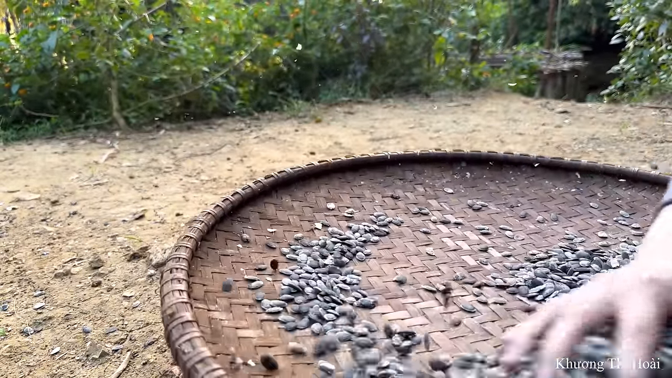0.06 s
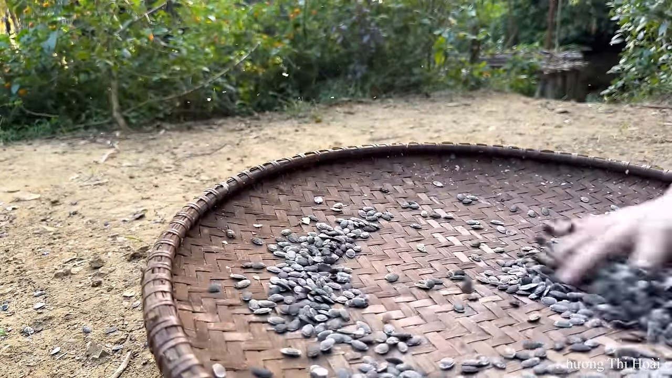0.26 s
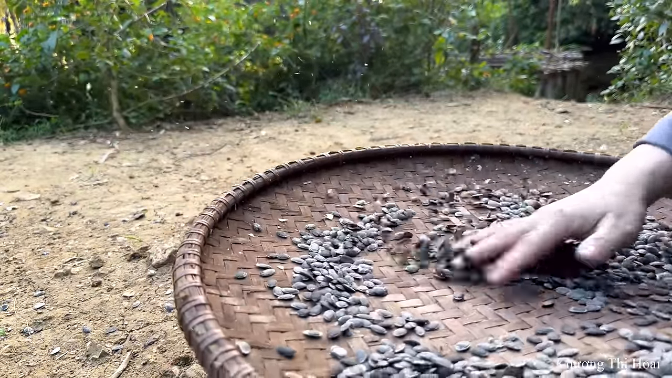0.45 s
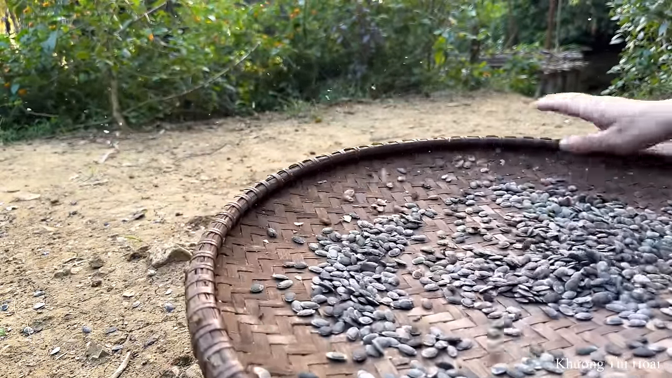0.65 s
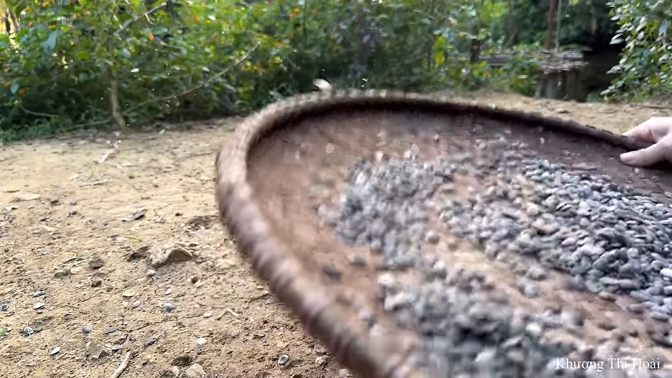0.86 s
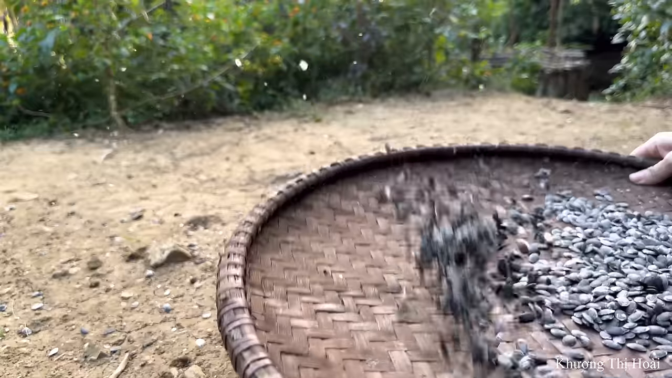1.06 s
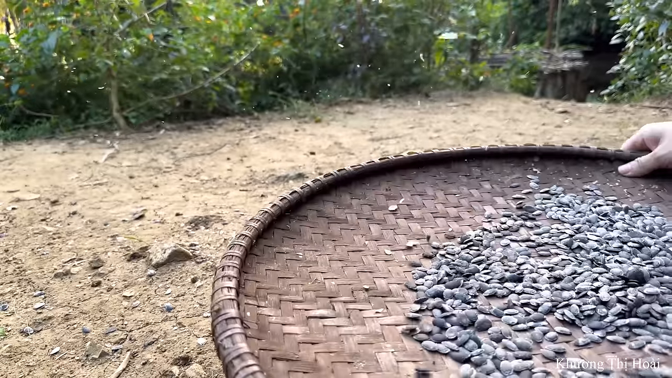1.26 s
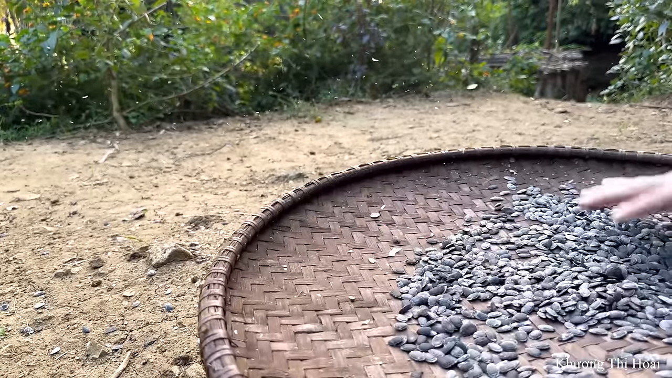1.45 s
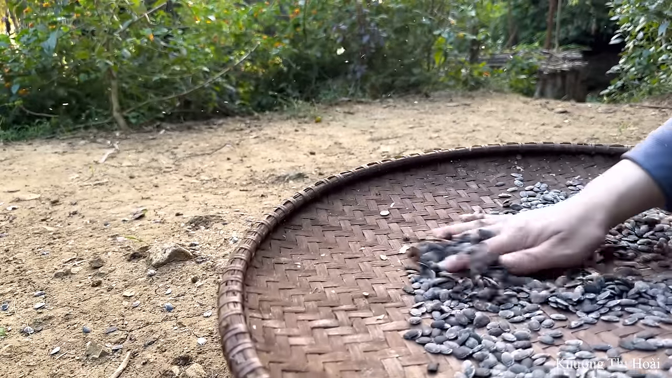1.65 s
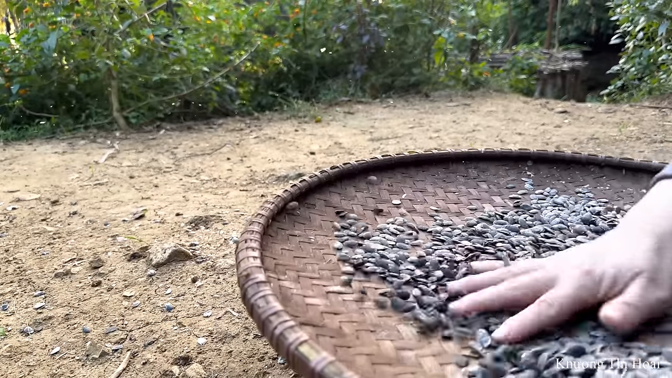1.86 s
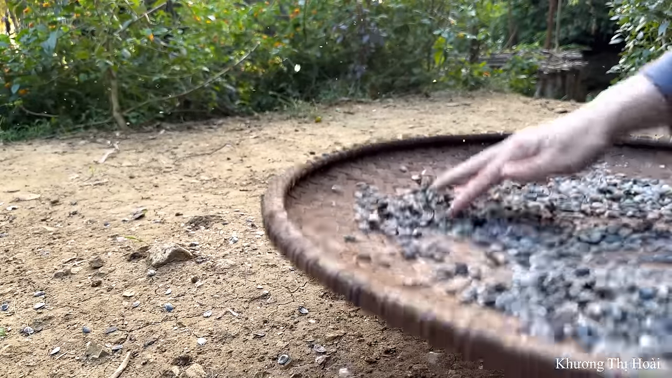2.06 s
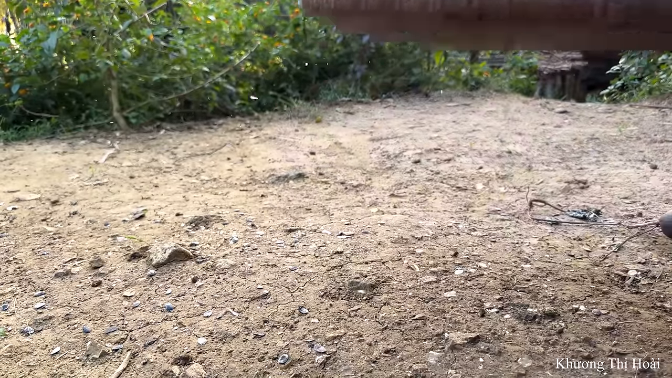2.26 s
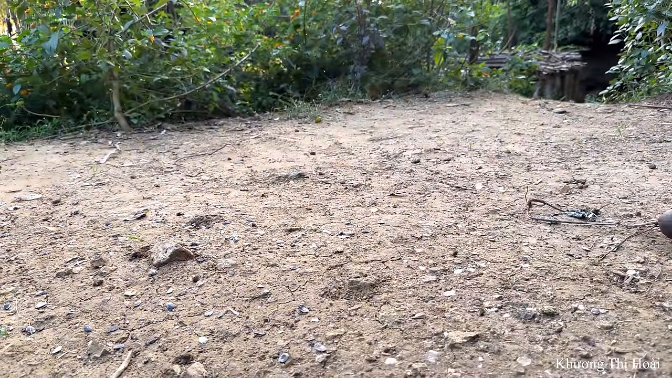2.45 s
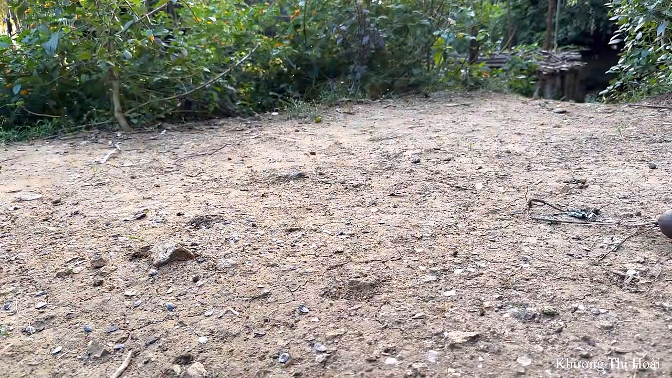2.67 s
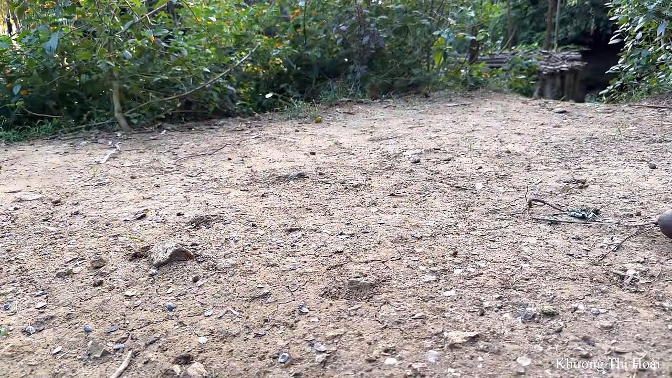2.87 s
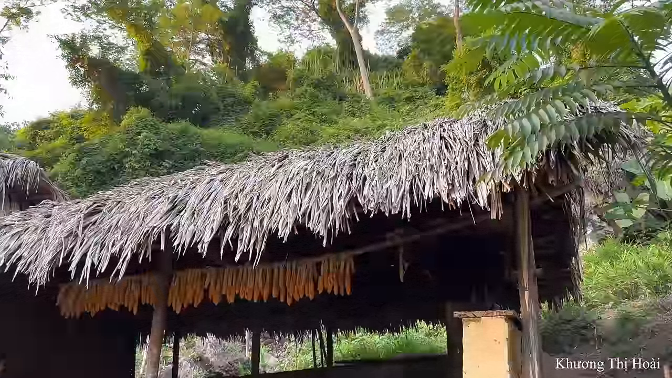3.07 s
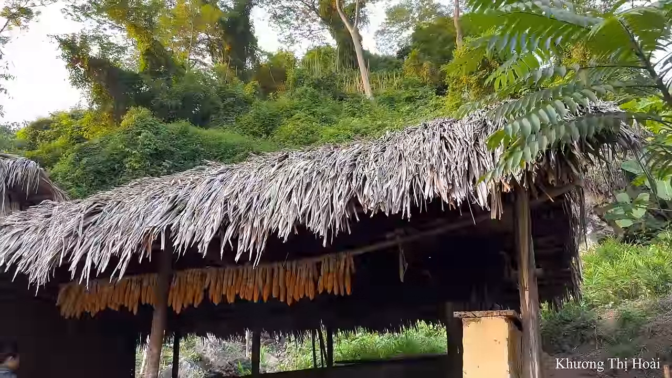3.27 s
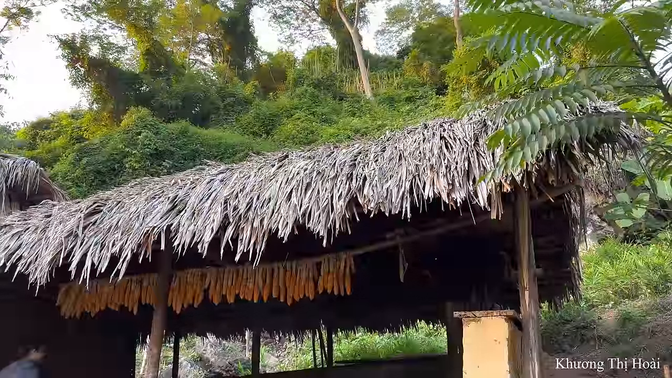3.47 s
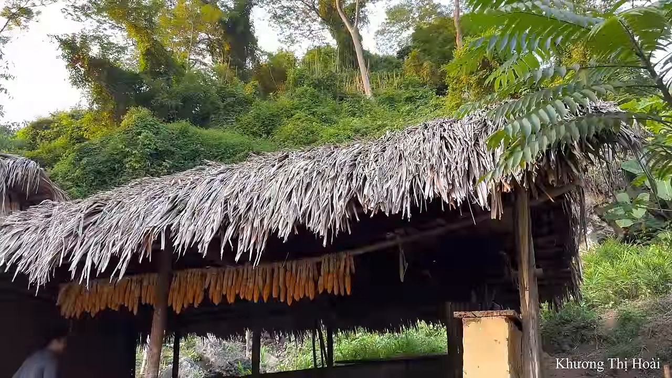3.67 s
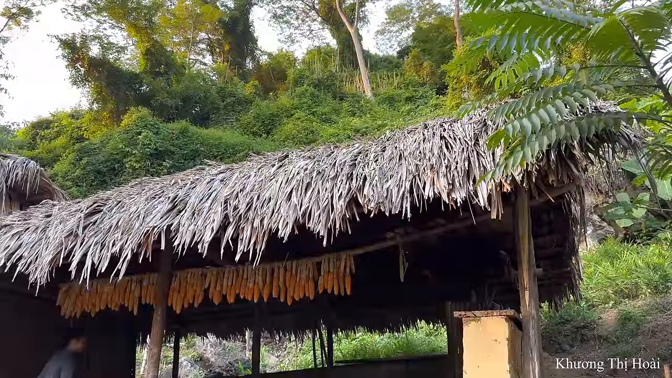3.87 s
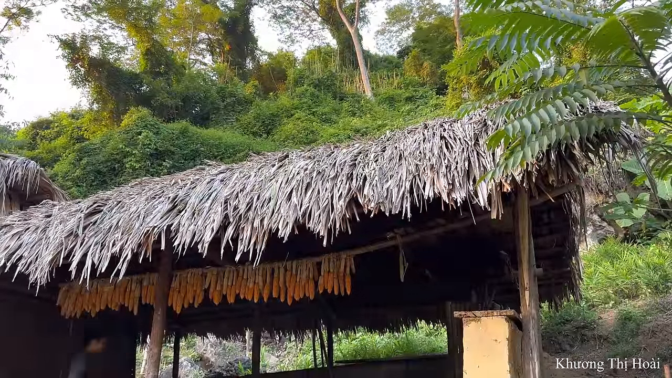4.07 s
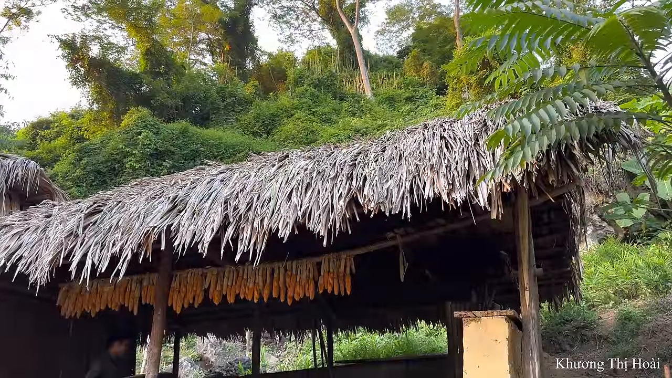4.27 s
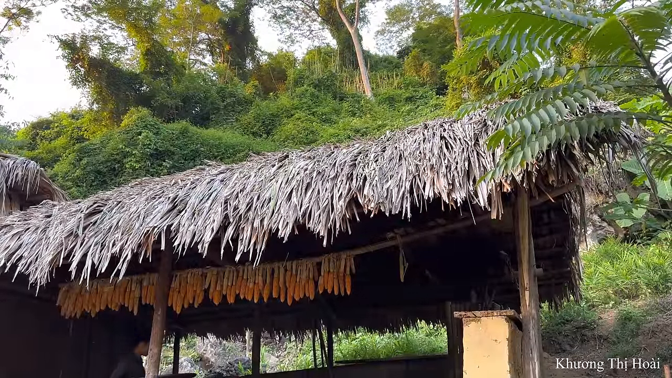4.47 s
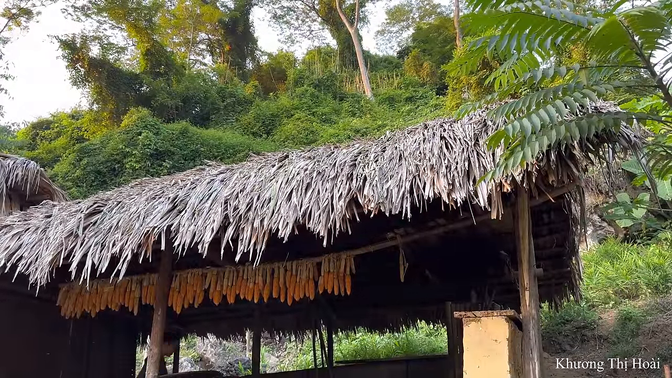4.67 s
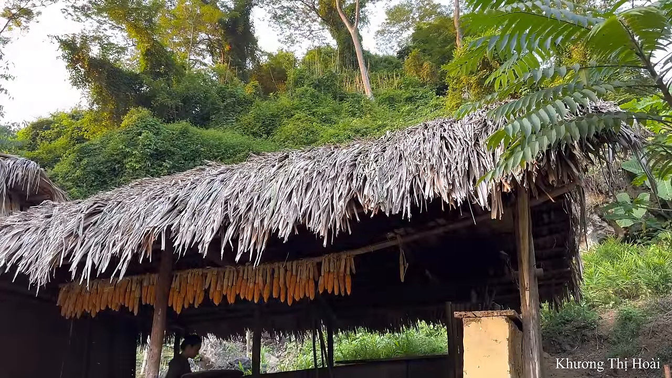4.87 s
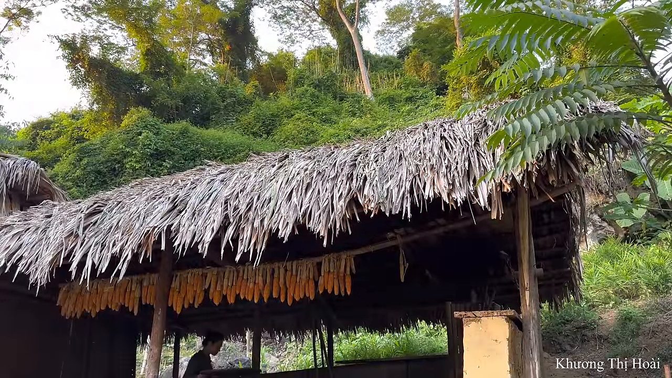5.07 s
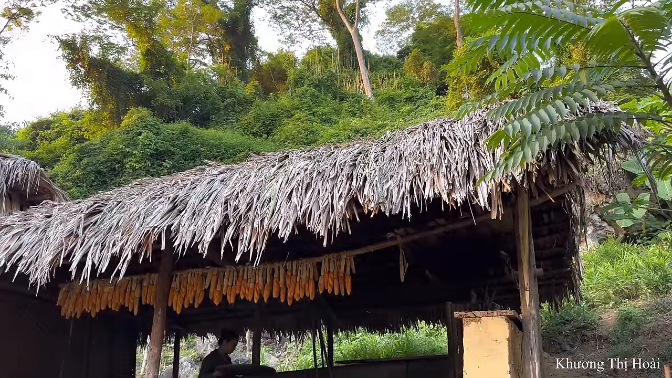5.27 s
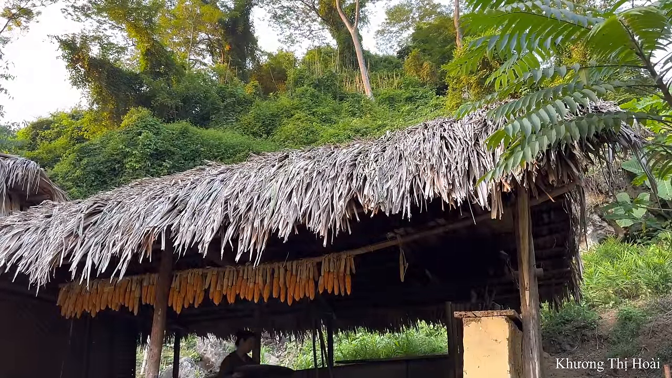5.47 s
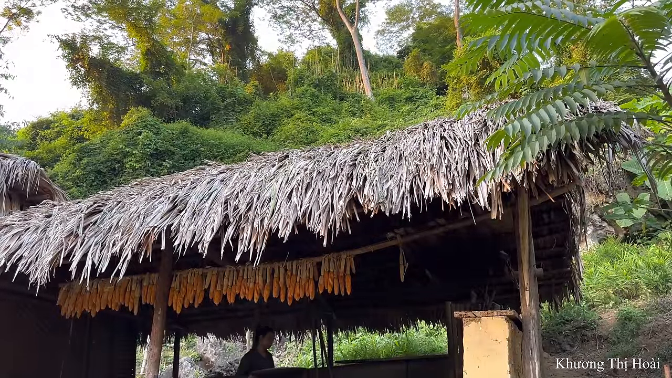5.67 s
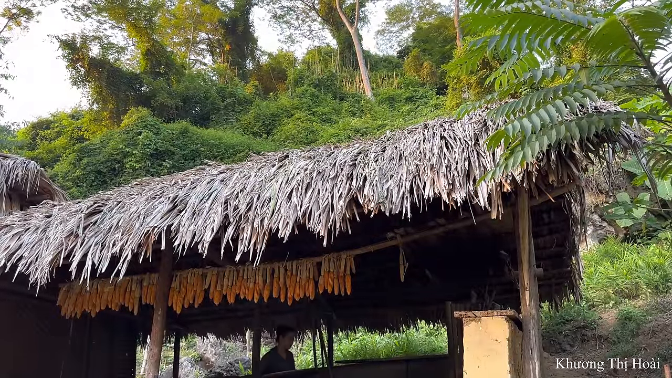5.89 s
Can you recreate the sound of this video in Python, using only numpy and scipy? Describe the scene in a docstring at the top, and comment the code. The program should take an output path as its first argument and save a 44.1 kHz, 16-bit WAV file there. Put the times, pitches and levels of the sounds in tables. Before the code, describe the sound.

From 0 s a hand sweeps dry, hard seeds over a woven bamboo tray, very close and slightly right: a strong grainy rush, then a sustained swish fading by about 0.7 s amid single drops. A small thud and slap at 0.75 s lead into a toss, loudest around 1.0-1.1 s, with a sharp bright crack at 1.14 s and settling rattle. Softer hand stirs come at about 1.55-2.1 s, with last seeds pattering until 2.25 s. From 2.4 to 3.1 s feet scuff and crunch on grit, with low soft thuds, in near-quiet open air. At 3.1 s the place changes abruptly: a steady, rapid, high cricket trill, roughly twenty pulses a second, sits on the left and grows slightly. A fainter, higher cricket, thin buzz and hissy insect chorus lie behind it. Distant rustling, faint squeaks, dry ticks and light wooden knocks continue to 6 s.

```python
"""Dried seeds are stirred by hand, tossed and caught in a woven bamboo tray, close by in a dirt yard:
random knocks, coloured band by band, ring the weave. Then feet scuff the ground in noise and crunches.
Beside a hut a cricket trills in gliding tones, with a fainter one, a buzz and a chorus of narrow noise.
Shaped noise also makes air, rustling, faint squeaks, ticks and knocks; low sine tones make the thuds."""
import sys
import numpy as np
from scipy import signal
from scipy.fft import rfft, irfft, next_fast_len
from scipy.io import wavfile

SR = 44100
rng = np.random.default_rng(int(sys.argv[2]) if len(sys.argv) > 2 else 0)


def store_wav(level_fs):
    """Save 16-bit WAV to argv[1]."""
    pcm = np.round(np.clip(np.atleast_2d(level_fs), -1, 1) * 32767)
    wavfile.write(sys.argv[1], SR, pcm.T.astype(np.int16))


N = 261513
TIME = np.arange(N) / SR
TRAY_GONE_S, HUT_FROM_S = 2.42, 3.09  # the seeds end; the sounds at the hut begin
HUT_FADE_S = 0.057  # fade-in at the hut

# Levels in all tables are set before panning, colouring and the trims in the functions.
# colour of the seeds: (f/Hz, level/dB)
SEED_COLOUR = [(50, -31), (120, -20), (250, -18), (400, -12.5), (700, -2.5), (1100, 1), (2000, 0.5),
               (3000, -4), (5000, -8.5), (7500, -15.5), (10500, -20), (13000, -17), (16000, -19)]
# how alike the two channels are for close sound: (f/Hz, likeness, 1 = the same)
CLOSE_LIKENESS = [(60, .8), (300, .55), (1800, .6), (3000, .35), (6000, .15), (9000, .35), (11000, .95),
                  (14000, .85)]


def from_db(db):
    """Turn decibels into a plain gain."""
    return 10 ** (np.asarray(db) / 20)


def rms_one(x):
    """Scale to an average strength (RMS) of 1."""
    return x / np.sqrt(np.mean(x ** 2) + 1e-20)


def in_time(rows, t):
    """Join the columns of a timed table by straight lines."""
    s, *columns = np.transpose(rows)
    return [np.interp(t, s, c) for c in columns]


def at_hz(points, hz):
    """Read a table on a log-frequency axis."""
    table_hz, values = np.array(points).T
    return np.interp(np.log(hz + 1e-9), np.log(table_hz), values)


def pan(left_db):
    """Gains that make the left channel louder than the right by left_db."""
    return from_db(np.array([[.5], [-.5]]) * left_db)


def placed(x, start_s=0):
    """Set a stereo sound into the whole length of the scene."""
    before = np.searchsorted(TIME, start_s)
    return np.pad(x, [(0, 0), (before, N - before - x.shape[1])])


def drift(rate, size=N):
    """Slow random wandering of strength 1, with rate new values per second."""
    knots = rng.standard_normal(int(rate * size / SR) + 2)
    return rms_one(np.interp(TIME[:size] * rate, np.arange(len(knots)), knots))


def decay(s, t60, t=TIME):
    """An envelope that starts at s and drops by 60 dB in t60 seconds."""
    return (t >= s) * np.exp(-np.log(1000) * np.clip((t - s) / t60, 0, 10))


def bursts(rows, t):
    """Bell-shaped swells, given as (t/s, level/dB, spread/s)."""
    return sum(from_db(db) * np.exp(-.5 * ((t - s) / spread) ** 2) for s, db, spread in rows)


def resonate(x, hz, width_hz):
    """A resonance with gain 1 on top."""
    r = np.exp(-np.pi * width_hz / SR)
    feed = np.array([1, 0, -1]) * (1 - r * r) / 2
    feedback = [1, -2 * r * np.cos(2 * np.pi * hz / SR), r * r]
    return signal.lfilter(feed, feedback, x + 1e-18)


def band(x, low_hz, high_hz):
    """Keep only the range between two frequencies."""
    edges = [low_hz, min(high_hz, SR / 2 - 1)]
    return signal.sosfilt(signal.butter(2, edges, "band", fs=SR, output="sos"), x + 1e-18)


def contacts(per_s, spread_db, t):
    """Random collisions of uneven size, with mean power near 1 at any rate."""
    chance = np.clip(per_s / SR, 0, 1)
    sizes = rms_one(from_db(spread_db * np.minimum(rng.exponential(1, len(t)), 4)))
    return sizes * (rng.random(len(t)) < chance) / np.sqrt(chance)


def coloured(force, colour, likeness, hiss_db=None, weight_db=None, patchy_db=0, patchy_per_s=50):
    """Force drives random noise in many bands; hiss and weight steer treble and bass against the middle."""
    edges = 32 * 2 ** np.arange(0, 9.3, .4)
    centres = np.sqrt(edges[1:] * edges[:-1])
    power = from_db(at_hz(colour, centres)) ** 2 * np.diff(edges)
    bass, treble = centres < 450, centres > 6000
    middle = power[~bass & ~treble].sum()
    lift_db = 0 if hiss_db is None else hiss_db - 10 * np.log10(power[treble].sum() / middle)
    press_db = 0 if weight_db is None else weight_db - 10 * np.log10(power[bass].sum() / middle)
    size = len(force)
    # three pairs of random strengths, which the bands use in turn
    strengths = force * rng.standard_normal((3, 2, size))
    flutter = rms_one(from_db(patchy_db * np.minimum(drift(patchy_per_s, size=size), 2)))
    out = 0
    for k, hz in enumerate(centres):
        mid, side = strengths[k % len(strengths)]
        alike = at_hz(likeness, hz)
        both = np.sqrt((1 + alike) / 2) * mid + np.sqrt((1 - alike) / 2) * side * [[1], [-1]]
        treble_tilt_db = lift_db * at_hz([(2000, 0), (8000, 1)], hz)
        bass_tilt_db = press_db * at_hz([(330, 1), (800, 0)], hz)
        gain = from_db(at_hz(colour, hz) + treble_tilt_db + bass_tilt_db)
        gain = gain * np.roll(flutter, rng.integers(size))  # the same flutter, shifted in each band
        out = out + band(both * gain, edges[k], edges[k + 1])
    return out * np.sqrt(SR / 2 / middle)


def pushes(rows, t):
    """Pushes rise, sag, then dull and stall; they add in power. Gives level, hiss and weight in dB."""
    rise_db, settle_db = 20, 40  # gained over the rise, lost over the settling
    sag_db_per_s = 7.5  # a push loses speed while it is held
    dulling_db = 11.5  # hiss lost over the settling: slow grains barely rub
    stall_share = .55  # share of the settling loss that comes ever faster: grains stall rather than fade
    power = hiss = weight = 1e-14
    for s, rise, hold, settling, db, hiss_db, weight_db in rows:
        age = t - s
        settled = np.clip((age - hold) / settling, 0, 2)
        loss_db = rise_db * np.maximum(-age, 0) / rise + sag_db_per_s * np.clip(age, 0, hold)
        loss_db = loss_db + settle_db * ((1 - stall_share) * settled + stall_share * settled ** 2)
        own = from_db(db - loss_db) ** 2
        power = power + own
        hiss = hiss + own * from_db(hiss_db - dulling_db * settled) ** 2
        weight = weight + own * from_db(weight_db) ** 2
    return 10 * np.log10([power, hiss / power, weight / power])


def open_air():
    """Distant rumble and leaves as soft noise; at the hut an uneven, far rustling as well."""
    # colour of the yard noise, with a deep dip near 11 kHz: (f/Hz, level/dB)
    yard_colour = [(25, -0.5), (55, 7), (130, 0.5), (260, -2), (500, -2), (1200, -2.5), (2500, -14.5),
                   (4500, -10), (7500, -15), (11000, -56.5), (16000, -17)]
    # colours of the noise at the hut and of the rustling: (f/Hz, level/dB)
    hut_colour = [(25, -3), (50, 8), (90, 5), (170, -8.5), (400, 0), (750, -10), (1300, -1), (2200, -9.5),
                  (3500, -15), (4800, -4), (8000, -13), (12000, -18), (16000, -17.5)]
    rustle_colour = [(60, 2), (150, 1), (280, -1), (420, -3), (650, 0), (850, -4.5), (1200, -2.5),
                     (1900, -3.5), (3000, -9), (6000, -35), (9000, -13), (16000, -42)]
    # how alike the channels are for far sound: (f/Hz, likeness, below 0 = opposed)
    far_likeness = [(60, .8), (150, .7), (350, .1), (700, -.35), (2000, -.45), (3500, .1), (9000, .35),
                    (11000, .9), (14000, .85)]
    # swells of distant rustling: (t/s, level/dB, spread/s)
    rustle_swells = [(3.42, -66.5, 0.13), (4.05, -67.5, .14), (4.555, -64, 0.036), (4.8, -66.5, 0.13),
                     (5.17, -66, 0.015), (5.5, -62.5, .035), (5.76, -63, 0.091)]
    rest_db = -73  # rustling between the swells
    yard, hut = TIME[TIME < HUT_FROM_S], TIME[TIME >= HUT_FROM_S]
    yard_noise = coloured(np.ones_like(yard), yard_colour, far_likeness, patchy_db=-0.5, patchy_per_s=14)
    hut_noise = coloured(np.ones_like(hut), hut_colour, far_likeness, patchy_db=3.0, patchy_per_s=21)
    stir = np.hypot(from_db(rest_db), bursts(rustle_swells, hut))
    stir = stir * np.hypot(contacts(300, spread_db=2.5, t=hut), .6)
    rustle = coloured(stir, rustle_colour, far_likeness, patchy_db=5.5, patchy_per_s=40)
    at_hut = (from_db(-68.0) * hut_noise + from_db(-1.5) * rustle) * pan(-0.85)
    fade_in = np.minimum((hut - HUT_FROM_S) / HUT_FADE_S, 1)
    return np.hstack([from_db(-68.0) * yard_noise, at_hut * fade_in])


def blurred_song(hz, width_hz):
    """Noise in a narrow band around one pitch, as when many far wings merge."""
    noise = rng.standard_normal((2, N))
    return rms_one(resonate(resonate(noise, hz, width_hz), hz, width_hz))


def cricket(first_s, period_s, pitch_ratio, t, waver=0.0012):
    """The wings close in an even rhythm; the tone sags as each stroke slows."""
    # one closing stroke, before pitch_ratio: (t/s into the stroke, f/Hz, level/dB)
    wing_stroke = [(0, 6420, -8), (.002, 6470, -2), (.007, 6370, -3.5), (.011, 6380, -3.5),
                   (.015, 6300, -7), (.018, 6030, -11), (.022, 5880, -37), (.03, 5775, -52)]
    hz, stroke_db = in_time(wing_stroke, (t - first_s) % period_s)
    wavering_hz = hz * pitch_ratio * (1 + waver * drift(400, size=len(t)))
    phase = 2 * np.pi * np.cumsum(wavering_hz) / SR
    uneven_db = .5 * drift(24.97, size=len(t)) + .5 * drift(500, size=len(t))
    return (t > first_s) * from_db(stroke_db + uneven_db) * np.sin(phase)


def insects():
    """A near cricket on the left, a higher one farther off, a thin buzz and a blurred chorus."""
    # each cricket: (level/dB, left over right/dB)
    near_db, near_left_db = (-46, 8.4)
    far_db, far_left_db = (-60.5, 4.5)
    # thin buzz: (f/Hz, width/Hz), and its one swell: (t/s, level/dB, spread/s)
    buzz_tone = (4730, 200)
    buzz_swell = (4.74, -70.5, 0.5)
    # far chorus: (f/Hz, width/Hz, yard level/dB, hut level/dB)
    hz, width_hz, yard_db, hut_db = (6340, 321, -67, -66)
    near_rhythm, far_rhythm = (3.0958, .04984), (3.141, .0457)  # first stroke s, period s
    growth_db_per_s = .5  # the near cricket slowly gains strength
    far_joins_s = .5  # the far cricket takes this long to reach full voice
    t = TIME[TIME >= HUT_FROM_S]
    age = t - HUT_FROM_S
    near_level = np.minimum(age / HUT_FADE_S, 1) * from_db(near_db + growth_db_per_s * age)
    near = near_level * cricket(*near_rhythm, pitch_ratio=0.98, t=t) * pan(near_left_db)
    far_level = np.minimum(age / far_joins_s, 1) * from_db(far_db + 0.72 * drift(9, size=len(t)))
    far = far_level * cricket(*far_rhythm, pitch_ratio=1.082, t=t, waver=0.0064) * pan(far_left_db)
    buzz_level = bursts([buzz_swell], t) * from_db(3.5 * drift(7.1, size=len(t)))
    buzz = buzz_level * blurred_song(*buzz_tone)[:, :len(t)]
    chorus_level = np.where(TIME < HUT_FROM_S, from_db(yard_db), from_db(hut_db) * pan(2))
    return placed(near + far + buzz, t[0]) + blurred_song(hz, width_hz) * chorus_level


def squeaks():
    """Faint high squeaks, perhaps of birds or insects, in a narrow band of hiss."""
    # brief squeaks: (t/s, level/dB, f/Hz, spread/s)
    faint_squeaks = [(1.334, -94, 4200, 0.035), (1.508, -62, 4450, 0.013), (2.292, -62, 3770, 0.026),
                     (2.656, -59, 3800, 0.021), (4.568, -53.5, 4670, 0.0059), (4.723, -61, 4100, 0.0046),
                     (5.166, -55.5, 4200, .009), (5.169, -61.5, 3080, 0.01)]
    out = 0
    for s, db, hz, spread in faint_squeaks:
        t = TIME[np.abs(TIME - s) < .1]
        hiss = rms_one(band(rng.standard_normal((2, len(t))), hz / 1.12, hz * 1.27))
        out = out + placed(hiss * bursts([(s, db, spread)], t), t[0])
    return out


def knocks(contact_t60=0.077):
    """Each wooden knock is a short clatter and a brief ring at one pitch."""
    # clearest knocks around the hut: (t/s, level/dB, f/Hz, t60/s of the resonance)
    wood_knocks = [(3.41, -52, 198, 0.053), (3.645, -58, 1130, .071), (3.967, -50, 258, 0.54),
                   (4.027, -55, 1070, 0.06), (4.096, -53.5, 1195, 0.034), (4.527, -56, 1730, .04),
                   (4.792, -54.5, 2880, .03), (4.845, -59, 199.6, .11), (5.054, -52.5, 1410, 0.023),
                   (5.261, -59.5, 1196, .049), (5.32, -57, 1065, 0.094), (5.484, -55.5, 1145, 0.066),
                   (5.745, -57.5, 462, .14), (5.748, -56.5, 650, .11)]
    out, t = np.zeros((2, N)), TIME[:SR // 6]
    for s, db, hz, t60 in wood_knocks:
        blow = decay(0, contact_t60, t) * rng.standard_normal((2, len(t)))
        ring = resonate(blow, hz, np.log(1000) / (np.pi * t60))
        clatter = band(blow, hz / 1.6, hz * 1.3)
        wood = ring / np.abs(ring).max() + 0.49 * clatter / np.abs(clatter).max()
        out += placed(from_db(db) * wood, s)
    return out


def ticks(t60=0.009, split_t60=0.002):
    """Brittle things split with a sharp crack and a short, bright rasp."""
    # dry husks, twigs and grit snapping: (t/s, level/dB)
    brittle_snaps = [(0.8677, -30), (1.134, -15), (1.140, -21), (1.2495, -32.5), (2.062, -26.5),
                     (2.1365, -35), (2.665, -42), (2.761, -45), (3.030, -37.5), (3.4907, -46),
                     (3.57, -43.5), (3.6928, -42), (4.7918, -46), (4.884, -43), (5.105, -44), (5.158, -44),
                     (5.2674, -45.5)]
    snaps = sum(from_db(db) * (0.56 * decay(s, t60) + .82 * decay(s, split_t60))
                for s, db in brittle_snaps)
    # mostly the same noise in both channels
    crack = snaps * (rng.standard_normal(N) + 0.1 * rng.standard_normal((2, N)))
    bright = from_db(2.0) * band(crack, 8200, 15500)
    middle = from_db(-5.5) * band(crack, 1500, 7000)
    return (bright + middle) * pan(-0.64)


def thuds(push_s=0.0013):
    """Soft, heavy contacts of tray and feet give a few low cycles that die away."""
    # dull thuds: (t/s, level/dB, f/Hz, t60/s)
    dull_thuds = [(0.736, -38, 79.3, 0.043), (1.075, -40, 201, 0.1), (1.185, -44.5, 130, 0.031),
                  (2.466, -50, 90, .046), (2.501, -47, 280, 0.031), (2.909, -39, 138, 0.055),
                  (2.912, -44.5, 88, 0.092), (3.08, -42.5, 134, .035), (3.434, -53.5, 108, .1),
                  (4.33, -53.5, 89.5, 0.078)]
    out = 0
    for s, db, hz, t60 in dull_thuds:
        age = TIME - s
        envelope = decay(s, t60) * np.clip(age / push_s, 0, 1)
        out = out + from_db(db) * envelope * np.sin(2 * np.pi * hz * age)
    return pan(-5.5) * out


def scuffs(grains_per_s=2500):
    """Grit crunches under each step, a little to the left."""
    # soles on grit, before trims: (t/s at full pressure, rise/s, hold/s, settling/s, level/dB,
    # hiss against middle/dB, weight against middle/dB)
    steps = [ (2.48, 0.054, 0.043, 0.21, -50, -8.5, -9.5), (2.642, 0.064, .003, .16, -48.5, -13, -16),
             (2.91, .02, .04, .11, -56, -9.5, -1), (2.99, .03, 0.088, .03, -56.5, -4.5, -9), ]
    # grit crushed under a sole: (t/s, level/dB, spread/s)
    crushed_grit = [(2.934, -48.5, 0.0016), (2.982, -50, 0.0009), (3.032, -55, 0.0024),
                    (3.046, -40.5, .0024), (3.074, -51, 0.0019)]
    # colour of the grit: (f/Hz, level/dB)
    grit_colour = [(50, -11), (150, 2), (400, 3), (700, -3.5), (1100, 4), (1500, -4.5), (2100, -2),
                   (4000, -4), (7500, -7.5), (11000, -7), (16000, -5.5)]
    t = TIME[(TIME >= TRAY_GONE_S) & (TIME < HUT_FROM_S)]
    level_db, hiss_db, weight_db = pushes(steps, t)
    grains = np.hypot(contacts(grains_per_s, spread_db=-0.5, t=t), .55)
    force = from_db(level_db - 2.5) * grains + bursts(crushed_grit, t)
    weight_db = np.minimum(weight_db, 3) - 0.5
    grit = coloured(force, grit_colour, CLOSE_LIKENESS, hiss_db, weight_db, patchy_db=5.0, patchy_per_s=64)
    return placed(grit, t[0]) * pan(0.49)


def yard_echo(x, t60=0.33):
    """Ground and bushes scatter a short, dull tail."""
    tail = band(rng.standard_normal((2, SR // 2)), 200, 5000) * decay(0.0036, t60, TIME[:SR // 2])
    return signal.fftconvolve(x, tail / np.sqrt(np.sum(tail ** 2) / 2), axes=1)[:, :N]


def from_right(x, body_pan_db=-3.0, husk_pan_db=0.0):
    """The body of the tray sounds from the right, the hiss of the husks from the middle."""
    body = signal.sosfilt(signal.butter(1, 3000, fs=SR, output="sos"), x)
    return body * pan(body_pan_db) + (x - body) * pan(husk_pan_db)


def tray(x):
    """The bamboo weave rings in its resonances."""
    # resonances of the tray: (f/Hz, width/Hz, level/dB)
    weave_rings = [(233, 90, -3), (300, 53, -8.5), (410, 17, -6), (582, 5.7, -6.5), (720, 70, -4),
                   (758, 35, -5), (980, 33, -4), (1090, 46, -6.5), (1278, 15, -6.5), (1588, 23, -4),
                   (1846, 47, -8.5), (1985, 60, -6), (2090, 60, -4.5), (2570, 40, -8), (3190, 32, -10)]
    return x + sum(from_db(db) * resonate(x, hz, width) for hz, width, db in weave_rings)


def drops(contact_t60=0.015):
    """Stray seeds land one by one, each with a brief chatter of noise."""
    # loudest single seeds dropping on the weave: (t/s, level/dB, snap: treble against middle/dB)
    single_seeds = [(0.612, -25, -13), (0.646, -31, -16), (0.694, -31, -11), (1.14, -15, -4),
                    (1.246, -25, -8.5), (2.059, -23.5, -17), (2.112, -34, -24), (2.138, -27.5, -6),
                    (2.173, -29.5, -10), (2.228, -37, -29.5)]
    t = TIME[TIME < TRAY_GONE_S]
    force = sum(from_db(db) * decay(s, contact_t60, t) for s, db, snap in single_seeds)
    _, snap_db = in_time(single_seeds, t)
    return placed(from_db(-8.5) * coloured(force, SEED_COLOUR, CLOSE_LIKENESS, snap_db))


def seeds(busy_per_s=5500, slap_weight_db=-21, slap_hiss_db=-10):
    """Seeds knock on each other and on the weave; harder strokes set more of them moving."""
    # pushes by hand or by a swing of the tray, before trims: (t/s at full speed, rise/s, hold/s,
    # settling/s, level/dB, husk hiss against middle/dB, weight on the weave against middle/dB)
    strokes = [ (0.0, .02, 0.0063, 0.17, -22.5, -11, -24), (0.07, .06, .26, 0.18, -29, -9, -20),
               (0.36, 0.11, .09, 0.43, -29.5, -13, -24), (0.785, .14, 0.012, 0.16, -40.5, -14.5, -15),
               (1.03, 0.1, .01, 0.096, -28, -10.5, -15), (1.075, 0.1, 0.031, .07, -19.5, -11.5, -20),
               (1.155, 0.062, .03, 0.26, -38.5, -14, -17.5), (1.557, 0.025, 0.071, .21, -31.5, -10, -22.5),
               (1.665, 0.073, .13, 0.28, -32, -15, -23), (1.857, 0.07, 0.0018, 0.081, -34.5, -9, -22),
               (1.935, 0.069, 0.062, .33, -34.8, -9.5, -22.5), ]
    # the heap lands or jerks as one: (t/s, level/dB, spread/s)
    slaps = [(0.769, -30, 0.0065), (0.9002, -32, 0.0034)]
    t = TIME[TIME < TRAY_GONE_S]
    level_db, hiss_db, weight_db = pushes(strokes, t)
    landing = bursts(slaps, t)
    level = np.hypot(from_db(level_db), landing)
    share = (landing / level) ** 2  # how much of the power is landing
    per_s = 120 + busy_per_s * level / from_db(-30)
    force = level * np.hypot(contacts(per_s, spread_db=1.5, t=t), .35)
    hiss_db = hiss_db + share * (slap_hiss_db - hiss_db) + 3.5
    weight_db = weight_db + share * (slap_weight_db - weight_db)
    heap = coloured(force, SEED_COLOUR, CLOSE_LIKENESS, hiss_db, weight_db, patchy_db=1.0, patchy_per_s=220)
    return placed(from_db(-2.5) * heap)


def scene():
    """Tray and feet close by with their echo, insects and air all around."""
    close = from_right(tray(seeds() + drops())) + scuffs()
    details = thuds() + ticks() + knocks() + squeaks()
    return close + from_db(-26.0) * yard_echo(close) + details + insects() + open_air()


def ports(x):
    """Sound reaches the two microphone ports with a phase that depends on frequency."""
    # phase between the ports: (f/Hz, lead of the left/rad)
    left_lead = [(200, .1), (1000, -.1), (2200, -.4), (3200, .8), (4300, .1), (5300, -.8), (7000, .9),
                 (9000, -1), (10200, -2), (11000, -3), (11800, -3.2), (12500, -3.9), (13600, -2 * np.pi)]
    size = next_fast_len(N + SR // 10)
    hz = np.arange(size // 2 + 1) * SR / size
    right = irfft(rfft(x[1], size) * np.exp(-1j * at_hz(left_lead, hz)), size)[:N]
    return np.array([x[0], right])


def record(dry):
    """A pair of small microphones without deep bass; the top is cut steeply at 16 kHz."""
    heard = signal.sosfilt(signal.butter(4, 42, "high", fs=SR, output="sos"), ports(dry))
    return signal.sosfilt(signal.ellip(12, .1, 80, 16000, fs=SR, output="sos"), heard)


dry = scene()
out = record(dry)
store_wav(out)
```